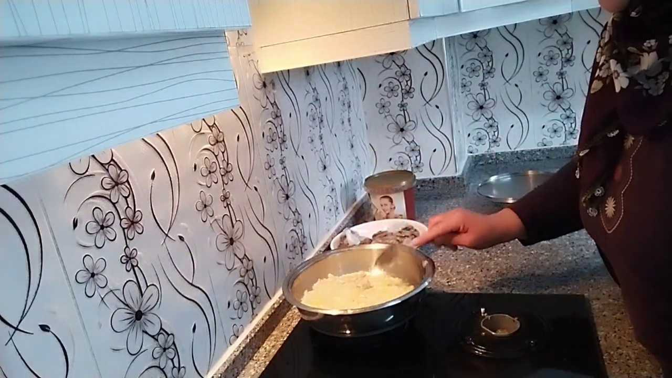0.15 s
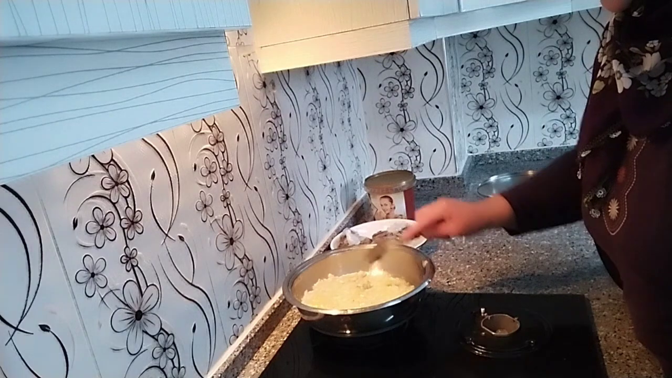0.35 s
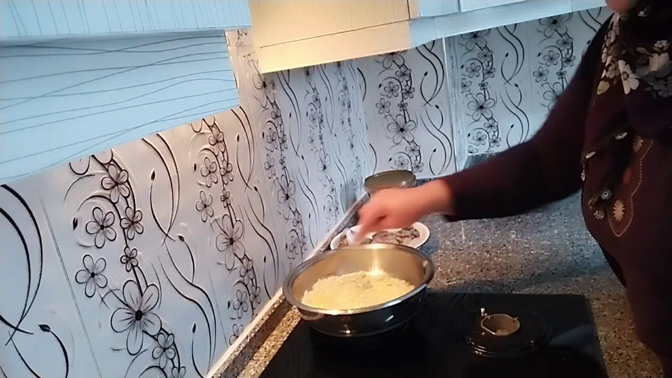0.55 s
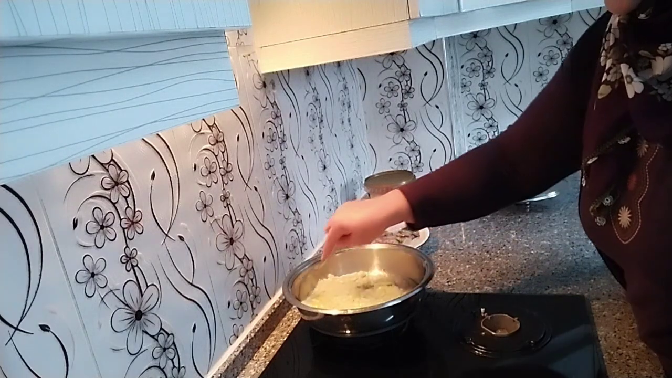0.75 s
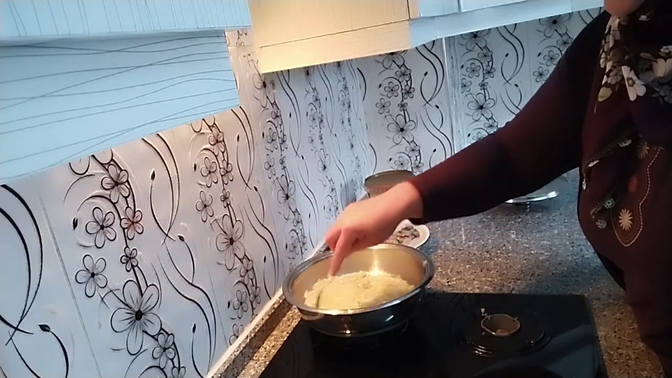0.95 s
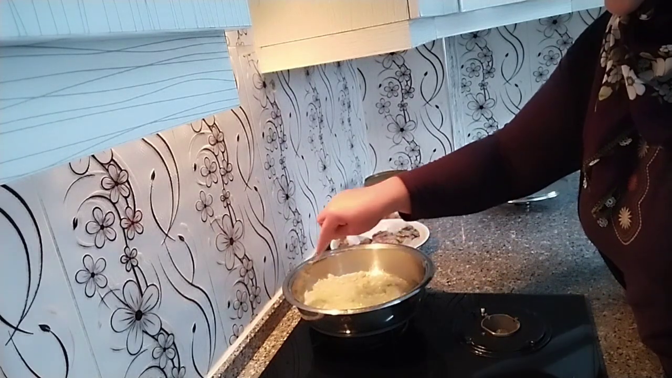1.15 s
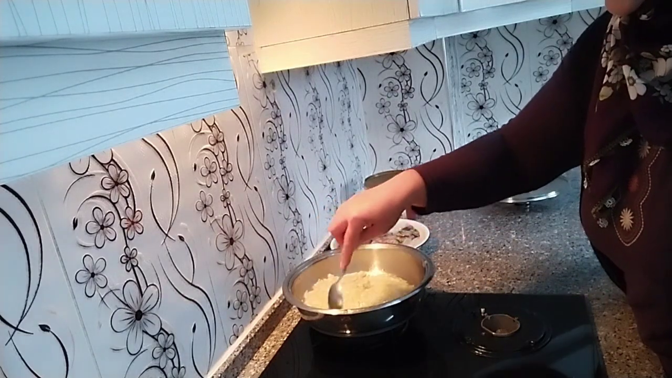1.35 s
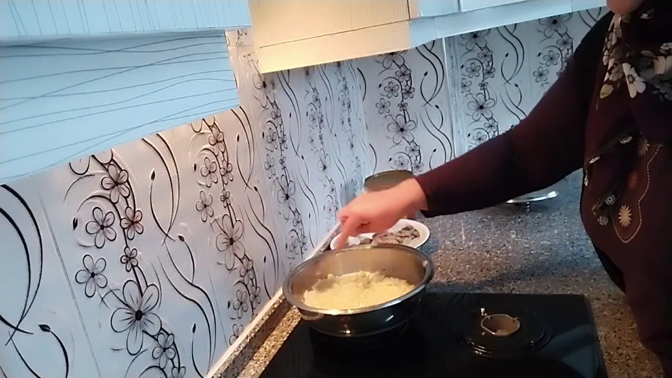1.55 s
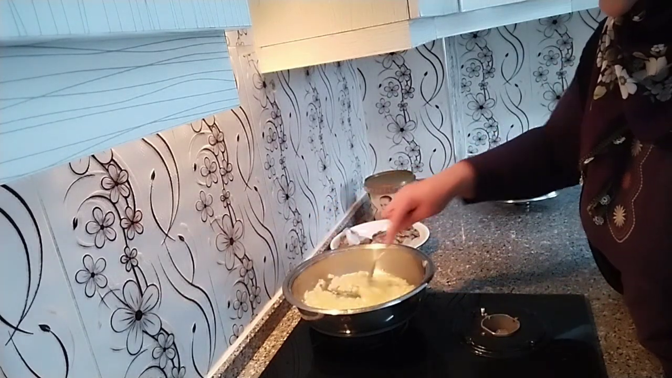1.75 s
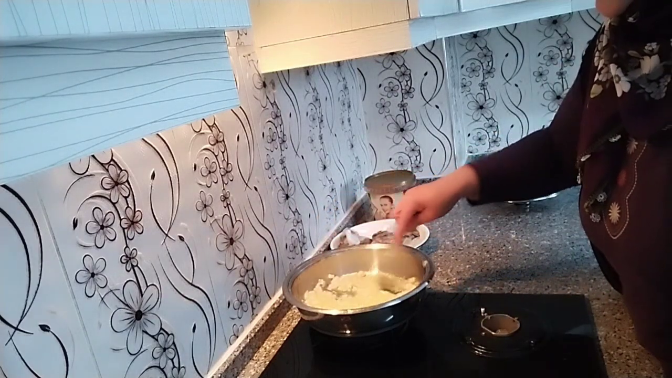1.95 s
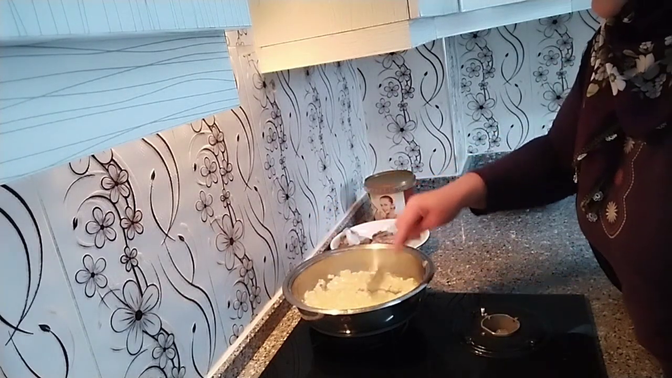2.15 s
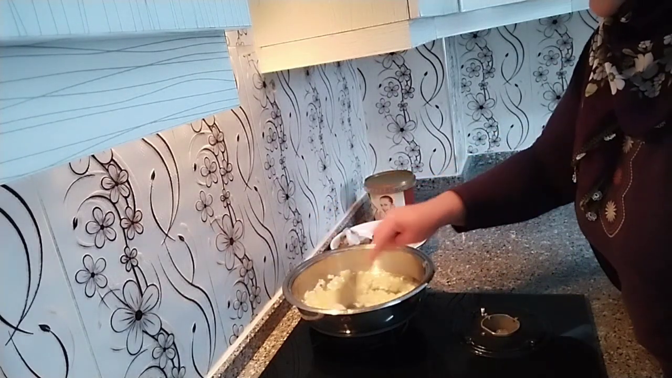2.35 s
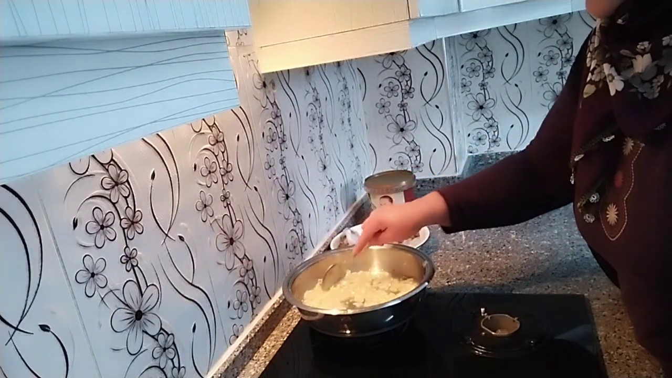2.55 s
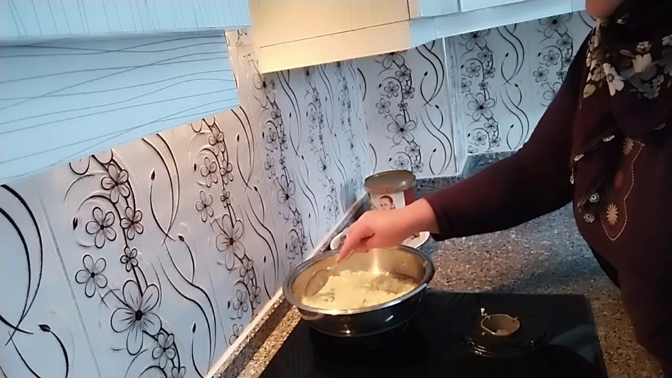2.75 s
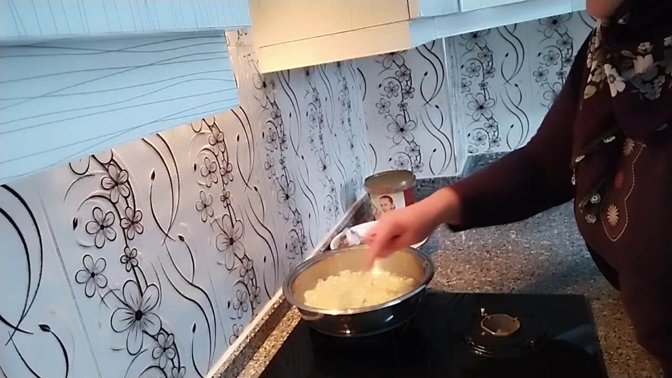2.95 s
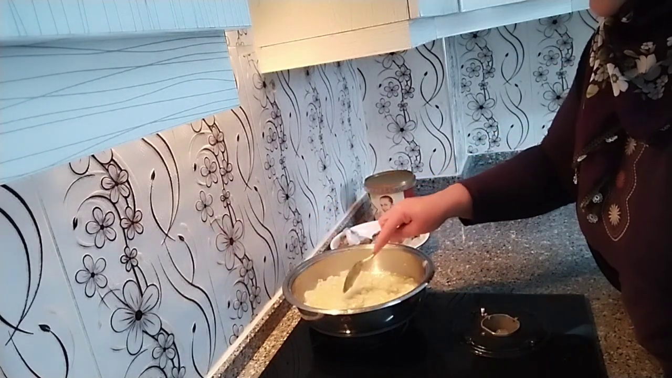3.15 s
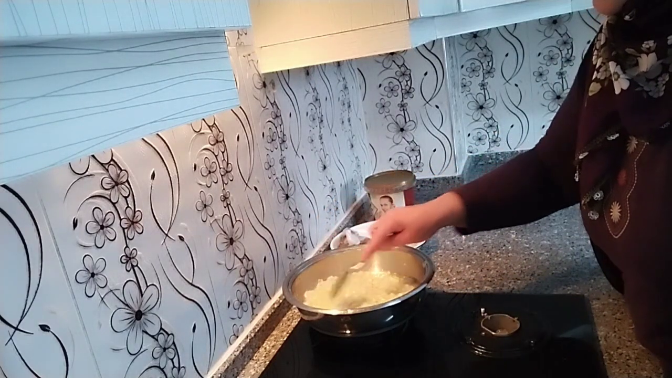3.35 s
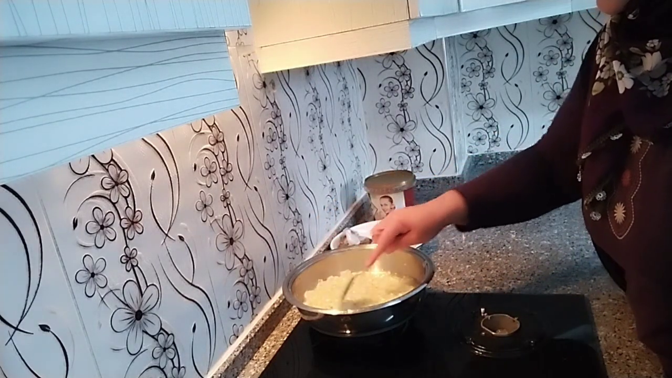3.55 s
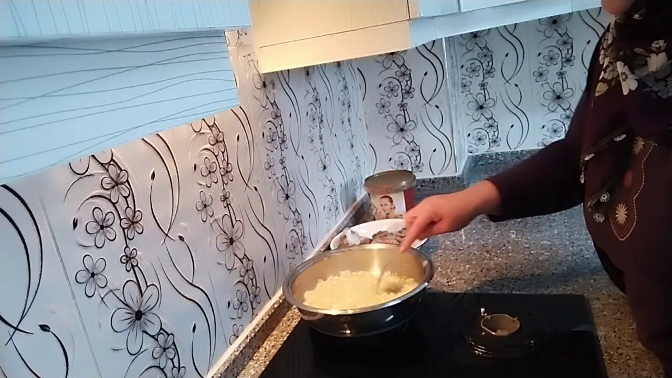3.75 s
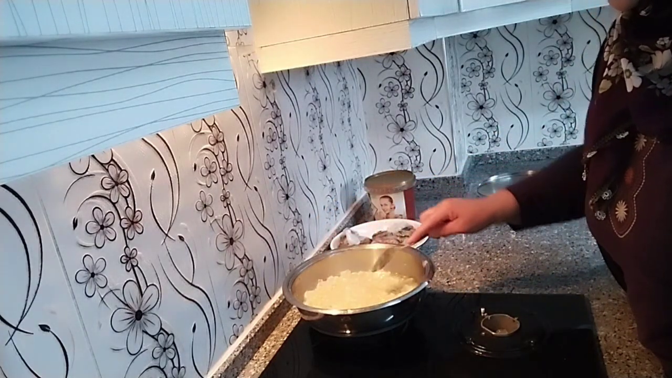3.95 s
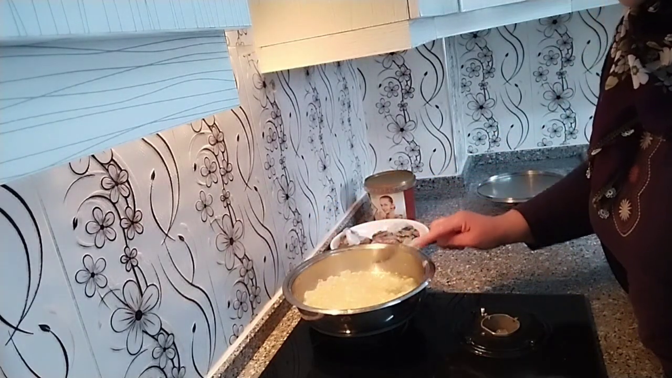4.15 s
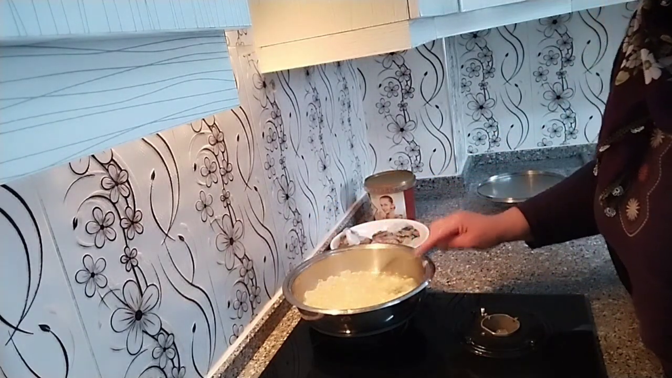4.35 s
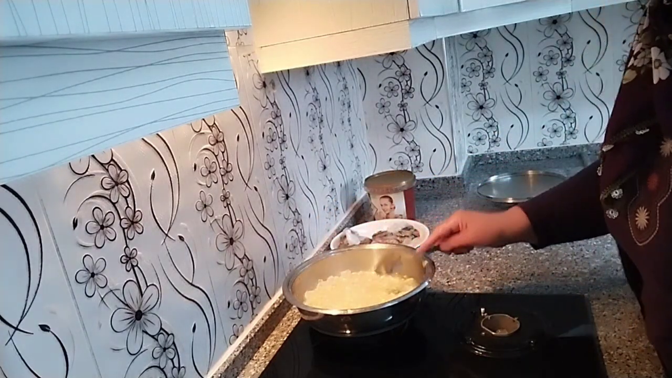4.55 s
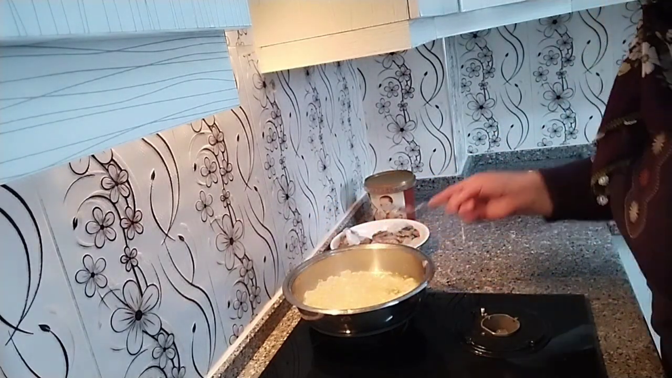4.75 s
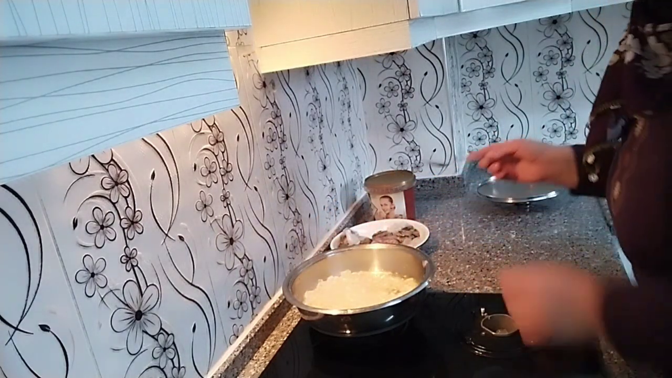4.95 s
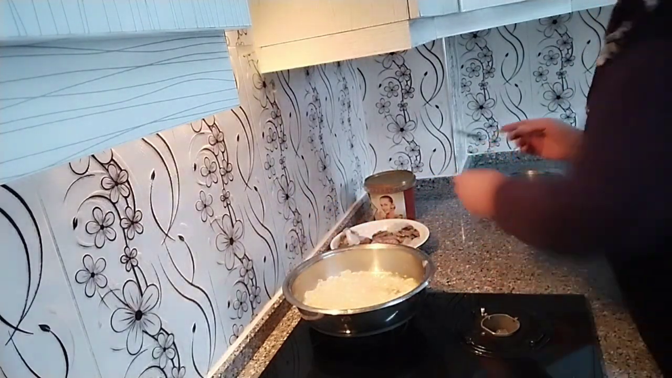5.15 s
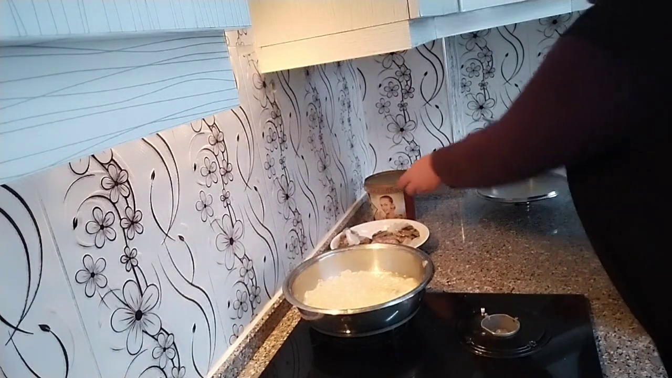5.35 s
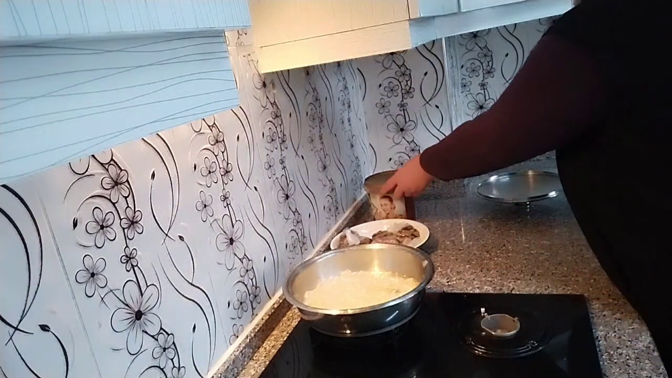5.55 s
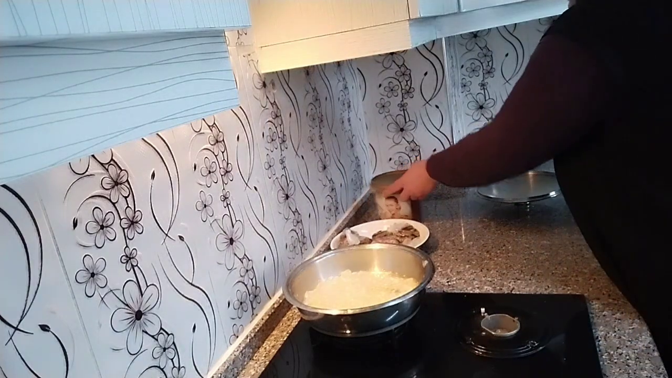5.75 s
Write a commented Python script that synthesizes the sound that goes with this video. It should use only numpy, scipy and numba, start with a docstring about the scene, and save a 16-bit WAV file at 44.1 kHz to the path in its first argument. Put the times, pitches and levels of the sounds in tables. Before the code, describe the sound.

Bright ringing spoon taps on a steel pot, a quieter stretch of stirring over faint sizzle, then three more clanging rim taps in a kitchen.

```python
"""A steel spoon taps the rim of a steel pot three times, stirs frying onions, and taps three times more.
While stirring it knocks and scrapes the wall and knocks the bottom; small pops and ticks are heard too.
Pot and spoon ring as sums of fading sine waves, and each blow adds a crack and a clatter.
Scrapes, pops and the soft sizzle are shaped noise. A small tiled kitchen answers all but the sizzle.
One microphone hears it, with little deep bass and little treble."""
import sys
import numpy as np
from scipy import signal
from scipy.fft import rfft, irfft
from scipy.io import wavfile
from scipy.ndimage import uniform_filter1d
from numba import njit

SR = 44100
rng = np.random.default_rng(int(sys.argv[2]) if len(sys.argv) > 2 else 0)


def log_audio(samples):
    """Write samples as a 16-bit WAV file to the path given in sys.argv[1]."""
    # one column per channel
    frames = np.atleast_2d(samples).T
    # limit to full scale, then quantise
    limited = np.clip(frames, -1, 1)
    pcm = np.round(limited * 32767).astype(np.int16)
    wavfile.write(sys.argv[1], SR, pcm)


N = 260190  # length of the scene in samples

# Sizzle and kitchen hush, only the shape counts. Each row: frequency in Hz, level in dB per Hz.
SIZZLE_COLOUR = [(40, -11.5), (110, -2.5), (200, -8.5), (400, -3.5), (800, -3), (1200, -2.5), (1900, -11),
                 (2600, -4), (4000, -7.5), (6000, -8.5), (8000, -12), (10000, -10), (13000, -17.5),
                 (16000, -10)]
# The sizzle grows while the onions are turned. Each row: time in seconds, level in dB.
SIZZLE_LEVEL = [(0, -54), (1.602, -56), (2.4, -51.5), (3.2, -53.5), (4.2, -54.5), (5.9, -55)]
# Faint narrow resonances in the hush, probably the pot sounding with the sizzle.
# Each row: frequency in Hz, width in Hz, level in dB against the sizzle.
HUSH_RESONANCES = [(592, 20, 5), (754, 24, 7), (830, 20, 5), (890, 12, 8), (1025, 24, 5), (1222, 20, 3)]
# Pitches at which the pot wall can ring, in Hz.
WALL_HZ = [129, 393, 834, 1093, 1114, 1669, 1815, 2273, 2670, 3029, 3071, 3291, 3765, 3800, 3860, 4298,
           4382, 4624, 4829, 5088, 5270, 5313, 5529, 5805, 6138, 6350, 6575, 6670, 7031, 7084, 2972, 3162,
           3316, 3892, 5880]
# How the wall rings at each of those pitches. Each row: level in dB, time to fade by 60 dB in seconds
# before extra losses, then the change in dB per unit of depth below the rim, of place around the rim,
# and of spoon angle.
WALL_MODES = [(-30, 0.61, -11, 5.5, 8), (-31.5, 1, -0.5, 6, -0.85), (-20, 0.56, 4, -11.5, -5.6),
              (-26, 1, -3, 5.5, -5), (-24, 0.49, 0, 1.5, 1.3), (-21.5, 0.41, -2.8, 1, 0.5),
              (-32, 0.99, -6.5, 2.5, -19), (-5.5, 0.5, -1.5, -6, -1), (-13.5, 0.86, -2.5, -9, -7.5),
              (-2, 0.42, -2.1, -3, -2.2), (-9.5, 0.17, -5, -11, 6), (-17.5, 0.36, -10.5, 6, -1.5),
              (-22, 0.17, -4, -9, 18), (-13.5, 0.35, 6.5, 0.5, 0.5), (-6, 0.42, -0.5, 6.5, -6),
              (-23, 0.53, 5.5, 9, -10), (-21.5, 0.29, -11, 3.5, 3.5), (-13.5, 0.14, -3.5, -6, 6.5),
              (-14.5, 0.33, 5, 9.5, 2.5), (-7, 0.54, 1, -7.5, -9), (-22.5, 0.37, 10, 1, -9),
              (-15.5, 0.96, 5.5, 7.5, -0.5), (-28.5, 0.71, 15, 4, -7), (-34.5, 0.18, 12.5, 10, -3.5),
              (-18.5, 0.81, 3, 10, 4), (-25.5, 0.14, 13.5, 1, -6), (-21.5, 0.21, 1, 3.5, -4.5),
              (-18.5, 0.49, -6.5, 4.5, -5.5), (-20, 0.87, -8.5, 4.5, 5.5), (-24, 0.31, -12, -1.5, 2),
              (-21, 0.55, 0, 1, 2), (-19, .4, 1, 5.5, 3), (-18.5, .4, 0, 10, 4), (-8, 0.27, 9, 4.5, -0.5),
              (-21.5, 0.44, 5.5, 7, -1.5)]
# Spoon left free to ring after a blow.
# Each row: frequency in Hz, level in dB, time to fade by 60 dB in seconds.
SPOON_MODES = [(1222, -26, 1.8), (1545, -29, 1.2), (3266, -24, .65), (2015, -38, .9)]
# Short clang of the spoon's bowl.
# Each row: frequency in Hz, level in dB, time to fade by 60 dB in seconds.
BOWL_MODES = [(4382, 1, .18), (4300, -9, .2), (4520, -9, .12), (3880, -8, .2)]
# Blows on rim and wall. Each row: time in seconds, level in dB, depth below the rim, place around the rim,
# spoon angle, clatter in dB, spoon ring in dB, bowl clang in dB, treble of the clatter in dB.
WALL_BLOWS = [(0.091, -10.5, -0.48, 1.38, 0.12, -20.5, -20.5, -42, -1),
              (0.241, -10, 0.046, 0.36, 1.69, -19.5, -17.5, -39.5, -12.5),
              (0.365, -9, -0.15, 0.13, 1.48, -16.5, -28.5, -49, -4),
              (0.847, -33, 0.89, -1.36, 1.14, -39.5, -30.5, -79, 9),
              (1.299, -21.5, 1.23, -0.28, 0.38, -36, -38, -28, 4.5),
              (1.74, -34.5, 1.48, -1.1, 0.52, -25.5, -33.5, -62.5, -15),
              (4.315, -9.5, -1.07, 0.15, -0.12, -16, -11.5, -17, 1),
              (4.493, -17, -1.97, -0.96, -0.44, -18, -22, -32.5, 2.5),
              (4.66, -13, -1.37, -0.62, 0.36, -20, -4.5, -32, 1)]
# Clatter of a blow. Each row: frequency in Hz, level in dB per Hz, time to fade by 60 dB in seconds
# before each part's own shortening and extra losses.
CLATTER_COLOUR = [(104, -11, 0.29), (330, -9.5, 0.62), (574.4, -18, 0.65), (1343, -9, 0.88),
                  (1900, -14.5, 0.81), (3080, -2.5, 0.29), (5240, -6, 0.5), (8400, -3.5, 0.31),
                  (9950, -5.5, 0.36), (13200, -13, 0.25), (16000, -8, .2)]
# Small pops and ticks. Each row: time in seconds, starting level in dB, centre in Hz, width in Hz.
POP_EVENTS = [(0.726, -54.5, 904, 888), (1.242, -52.5, 1472, 2620), (1.457, -36.5, 4020, 4800),
              (1.943, -51, 2720, 3000), (2.745, -47, 3400, 1800), (2.857, -43, 5200, 1795),
              (2.94, -51.5, 1520, 2480), (3.077, -48, 5970, 4000), (3.744, -52, 4075, 503),
              (4.165, -53.5, 864, 800), (5.173, -45, 1640, 1498), (5.258, -51.5, 885, 892),
              (5.35, -53, 810, 707), (5.779, -52, 3940, 234.5), (5.826, -44, 6000, 2170)]
# Spoon edge scraping the wall. Each row: start in seconds, length in seconds, level in dB.
SCRAPE_EVENTS = [(0.99, 0.088, -55), (1.348, 0.11, -41.5)]
# Bottom of the pot, damped by onions. Each row: frequency in Hz, level in dB, time to fade by 60 dB in
# seconds before extra losses, change in dB per unit of distance from the middle.
BOTTOM_MODES = [(133, -14, 0.75, 1), (281.7, -7, 0.19, 9), (750, -13, 0.3, 10), (1039, -27.5, 0.51, 14.5),
                (1518, -14.5, 0.44, 3), (1660, -7.5, 0.15, 2.5), (2415, -7.5, 0.22, 0),
                (2570, -1.5, 0.36, -21), (2770, -4.5, 0.19, -8), (2916, -14.5, 0.28, 2),
                (4140, -8, 0.39, -21), (4010, -7.5, 0.28, -1), (5000, -31.5, 0.082, -20),
                (5060, -24, 0.2, 24.5), (5580, 0, 0.15, -2.5), (5990, 0.5, 0.027, 17), (6520, -13, 0.24, 9),
                (6620, -9, 0.32, -15), (7620, -10.5, 0.27, 6), (7950, 2, 0.11, -7)]
# Knocks on the bottom. Each row: time in seconds, level in dB, distance from the middle from 0 to 1.
BOTTOM_KNOCKS = [(2.013, -23, 0.38), (2.372, -35.5, 0.84), (3.158, -28, 0.22)]
# Microphone colour. Each row: frequency in Hz, level in dB.
MIC_COLOUR = [(30, -20.5), (60, -19.5), (95, -6), (7400, -3), (8400, -12), (9300, -30), (10500, -22),
              (12000, -16.5), (15500, -16), (16200, -33.5)]

SPOON_HELD_S = 5.2  # the other hand closes on the spoon
ONION_DEPTH = 0.43  # below this depth the wall is covered by onions
RIM_LOSS_PER_S, ONION_LOSS_PER_S = 0.56, 1.1  # extra loss at the rim; added per unit of depth into the onions
FREE_LOSS_PER_S = 0.18  # less loss per unit of height on the rim, where the spoon springs off
TILT_DB_PER_DEPTH = 0.46  # per octave: deeper blows have a brighter clatter
# In the clatter: a blow on the rim drives the pot into the stove, one into the onions hardly.
RIM_THUD_DB, THUD_DB_PER_DEPTH = 6.5, -16
RIM_CRACK, ONION_CRACK = 2.2, 1  # crack against clatter at the rim; added per unit of depth into the onions
BEAT_DB, BEAT_DB_PER_DEPTH = -9, 5  # neighbours against each wall mode: high on the rim the ring is purest
KNOCK_CLATTER_DB, KNOCK_TREBLE_DB = -0.5, -8.5  # clatter is against the level of the knock
# Each pair: value in the middle, change out to the wall. Extra loss in 1/s, tilt in dB per octave, thud in dB.
KNOCK_LOSS_PER_S, KNOCK_TILT_DB, KNOCK_THUD_DB = (0.57, 0.19), (1.1, -3), (-12, -3.5)
SCRAPE_RISE_DB_S, SCRAPE_FALL_DB_S = 325, 605  # dB per second
STOP_DB_S = 250  # a scrape ends with the spoon pressed to the wall, which stops the ring
POP_T60_S = 0.14  # for a width of 1 kHz; narrower pops ring longer
ROOM_T60_S, ROOM_DB = .28, -11
TOP_HZ = 16700  # nothing much is heard above this
RING = int(1.3 * SR)  # longest ring, in samples


def undb(db):
    """Turn decibels into a plain factor."""
    return 10 ** (np.asarray(db) / 20)


def add(out, s, x):
    """Mix x into out from time s in seconds."""
    i = int(s * SR)
    out[i:i + len(x)] += x[:N - i]


def colour(x, points):
    """Filter by (Hz, dB) points without sounding early: minimum phase, from the cepstrum."""
    f, db = np.transpose(points)[:2]
    grid = np.linspace(1, SR / 2, 2049)
    log_gain = np.interp(np.log(grid), np.log(f), db) * np.log(10) / 20
    cepstrum = irfft(log_gain)
    # fold the second half onto the first
    cepstrum[1:2048] *= 2
    cepstrum[2049:] = 0
    response = irfft(np.exp(rfft(cepstrum)))
    return signal.fftconvolve(x, response)[:len(x)]


def band(x, hz, width_hz):
    """Keep only a band of frequencies around hz."""
    low = np.sqrt(hz ** 2 + width_hz ** 2 / 4) - width_hz / 2
    high = min(low + width_hz, .49 * SR)
    return signal.sosfilt(signal.butter(2, [low, high], "band", fs=SR, output="sos"), x)


def walk(rate):
    """Wander smoothly between random levels, about rate of them per second, with a spread of 1."""
    hold = int(SR / rate)
    steps = np.repeat(rng.standard_normal(N // hold + 1), hold)
    smooth = uniform_filter1d(uniform_filter1d(steps, hold), hold)[:N]
    return smooth / smooth.std()


def sizzle():
    """Countless tiny bubbles: grainy noise with some larger grains, flickering a little in octave bands."""
    grain_size = np.minimum(rng.exponential(size=N // 64 + 1), 6)
    grains = rng.standard_normal(N) * undb(1.6 * grain_size.repeat(64)[:N])
    hiss = colour(grains, SIZZLE_COLOUR)
    out = hiss.copy()
    for hz in 60 * 2. ** np.arange(0, 9):
        flicker = undb(.7 * walk(20)) - 1
        out += band(hiss, hz, hz * .7) * flicker
    for hz, width_hz, db in HUSH_RESONANCES:
        out += undb(db) * band(hiss, hz, width_hz)
    level_db = np.interp(np.arange(N) / SR, *np.transpose(SIZZLE_LEVEL))
    return out / out.std() * undb(level_db)


@njit
def sines(hz, gain, t60, phase, size):
    """Add up fading sine waves; each t60 is the time in seconds to fade by 60 dB."""
    out = np.zeros(size)
    for k in range(len(hz)):
        # each sample turns z a little and shrinks it a little
        pole = np.exp(2j * np.pi * hz[k] / SR - np.log(1000) / (t60[k] * SR))
        z = gain[k] * np.exp(2j * np.pi * phase[k])
        for i in range(min(size, int(1.2 * t60[k] * SR))):
            out[i] += z.imag
            z *= pole
    return out


def damped(t60, loss):
    """Shorten rings by a loss in 1/s from onions or a lingering spoon; long rings lose most."""
    return 1 / (1 / t60 + max(loss, 0))


def swell(rise_s):
    """Let the start of a ring build up smoothly instead of clicking on."""
    return 1 - np.exp(-np.arange(RING) / SR / rise_s)


def slant(hz, tilt, thud_db, treble_db):
    """Colour one blow in dB: tilt brightens, the thud into the stove adds bass, the spoon edge treble."""
    tilt_db = tilt * np.log2(np.clip(hz, 500, 8000) / 3000)
    bass_db = thud_db / (1 + (hz / 500) ** 4)
    edge_db = treble_db / (1 + (9000 / hz) ** 8)
    return tilt_db + bass_db + edge_db


def ring(hz, db, t60, rise_s=0.0042, twin_db=-10, split_hz=30, count=2):
    """Modes of a round vessel come with close neighbours, mostly weaker, that make them beat."""
    chance = rng.random((2, count * len(hz)))
    t60 = np.maximum(t60, .01)
    centre_hz = np.tile(hz, count)
    # split_hz holds at 3 kHz and grows with pitch
    twin_hz = centre_hz + split_hz * np.sqrt(centre_hz / 3000) * (2 * chance[0] - 1)
    twin_gain = np.tile(undb(db + twin_db), count)
    twins = sines(twin_hz, twin_gain, np.tile(t60, count), chance[1], RING)
    main = sines(hz, undb(db), t60, 0 * hz, RING)
    return (main + twins) * swell(rise_s)


def clatter(db, contact, loss, crack, count=500):
    """A sharp crack, and hundreds of lesser modes of pot and grate, different for every blow."""
    f, spec_db, t60 = np.transpose(CLATTER_COLOUR)
    chance = rng.random((4, count))
    hz = 80 + 16000 * chance[0] ** 1.6
    at = np.log(hz), np.log(f)
    # the modes crowd at the bottom of the range, so each one there is weaker
    crowding_db = 3.75 * np.log10(hz / 3000) - 6
    mode_db = np.interp(*at, spec_db) + slant(hz, *contact) + crowding_db
    gain = undb(db + mode_db - 15.5 * chance[1])
    life = damped(np.interp(*at, t60) * (0.34 + .5 * chance[2]), loss)
    lesser_modes = sines(hz, gain, life, chance[3], RING)
    # the crack fades in 18 ms and is stronger above 9 kHz
    crack_gain = gain * (1 + 0.46 * (hz > 9000))
    sharp_crack = sines(hz, crack_gain, 0.018 + 0 * hz, chance[2], RING)
    return (lesser_modes + crack * sharp_crack) * swell(0.0019)


def stopped(x, s):
    """Fade a ring begun at s when a scrape that soon follows it comes to rest."""
    for start, length, _ in SCRAPE_EVENTS:
        if 0 < start - s < .2:
            since_rest_s = np.arange(len(x)) / SR + s - start - length
            return x * undb(-STOP_DB_S * np.maximum(since_rest_s, 0))
    return x


def taps():
    """Where and how the spoon lands decides how strongly each mode of the wall moves."""
    pot, spoon = np.zeros(N), np.zeros(N)
    hz = np.array(WALL_HZ, float)
    db, t60, *shape_db = np.transpose(WALL_MODES)
    t60 = np.minimum(t60, 1700 / hz)  # high modes radiate their energy sooner
    for s, blow_db, depth, place, angle, clatter_db, spoon_db, bowl_db, treble_db in WALL_BLOWS:
        sunk = np.clip(depth - ONION_DEPTH, 0, 1)
        loss = RIM_LOSS_PER_S + ONION_LOSS_PER_S * sunk + FREE_LOSS_PER_S * min(depth, 0)
        contact = TILT_DB_PER_DEPTH * depth, RIM_THUD_DB + THUD_DB_PER_DEPTH * sunk, treble_db
        mode_db = blow_db + db + np.dot([depth, place, angle], shape_db)
        twin_db = BEAT_DB + BEAT_DB_PER_DEPTH * depth
        wall = ring(hz, mode_db, damped(t60, loss), twin_db=twin_db, split_hz=45, count=4)
        add(pot, s, stopped(wall, s))
        add(pot, s, clatter(clatter_db, contact, loss, RIM_CRACK + ONION_CRACK * sunk))
        spoon_modes = np.transpose(SPOON_MODES) + [[0], [spoon_db], [0]]
        add(spoon, s, ring(*spoon_modes, rise_s=0.017, twin_db=-19.0))
        bowl_modes = np.transpose(BOWL_MODES) + [[0], [bowl_db], [0]]
        add(spoon, s, ring(*bowl_modes))
    held_s = np.maximum(np.arange(N) / SR - SPOON_HELD_S, 0)
    return pot + spoon * undb(-150 * held_s)  # the held spoon fades by 150 dB per second


def pops():
    """Short fading bursts of noise from bursting juice and light touches of the spoon."""
    out, t = np.zeros(N), np.arange(RING // 4) / SR
    for s, db, hz, width_hz in POP_EVENTS:
        burst = band(rng.standard_normal(len(t)), hz, width_hz)
        fade_db = -60 * t * np.sqrt(width_hz / 1000) / POP_T60_S
        add(out, s, burst / burst.std() * undb(db + fade_db))
    return out


def scrapes():
    """Dense uneven slips of the spoon hiss and keep the wall modes sounding."""
    t = np.arange(N) / SR
    push = np.zeros(N)
    for s, length, db in SCRAPE_EVENTS:
        rise_db = SCRAPE_RISE_DB_S * np.maximum(s - t, 0)
        fall_db = SCRAPE_FALL_DB_S * np.maximum(t - s - length, 0)
        push += undb(db - rise_db - fall_db)
    slips = push * rng.standard_normal(N) * undb(4 * walk(400))
    db, t60, deep_db = np.transpose(WALL_MODES)[:3]
    # the wall is rubbed at a depth of 0.85
    wall = sines(np.array(WALL_HZ, float), undb(db + 0.85 * deep_db - 28.5), 0.31 * t60, 0 * db, RING)
    hiss = undb(5.5) * band(slips, 6600.0, 8400.0)
    return hiss + signal.fftconvolve(slips, wall)[:N]


def knocks():
    """The bottom under the onions rings short and blurred, with a hard crack."""
    out = np.zeros(N)
    hz, db, t60, outward_db = np.transpose(BOTTOM_MODES)
    for s, blow_db, distance in BOTTOM_KNOCKS:
        loss, tilt, thud_db = np.dot([KNOCK_LOSS_PER_S, KNOCK_TILT_DB, KNOCK_THUD_DB], [1, distance])
        contact = tilt, thud_db, KNOCK_TREBLE_DB
        mode_db = blow_db + db + distance * outward_db + slant(hz, *contact)
        # many strong neighbours blur each mode
        bottom = ring(hz, mode_db, damped(t60, loss), rise_s=.0006, twin_db=-1, split_hz=110, count=8)
        add(out, s, bottom)
        add(out, s, clatter(blow_db + KNOCK_CLATTER_DB, contact, loss, 7.3))
    return out


def kitchen(x):
    """Tiled walls return a dense tail of noise that builds up, fades, and roughens every ring."""
    t = np.arange(SR // 2) / SR
    tail = rng.standard_normal(len(t)) * undb(-60 * t / ROOM_T60_S) * (1 - np.exp(-t / 0.032))
    echo = signal.fftconvolve(x, tail / np.linalg.norm(tail))[:N]
    return x + undb(ROOM_DB) * echo


def scene():
    """All sources at the single microphone; the sizzle has no added room tail."""
    struck = taps() + knocks() + scrapes() + pops()
    return (kitchen(struck) + sizzle())[None]


def record(dry):
    """The microphone loses deep bass and much above 8 kHz, rounds the loudest peaks and cuts the top."""
    heard = np.tanh(0.77 * colour(dry[0], MIC_COLOUR)) / 0.72
    top_cut = signal.ellip(10, .2, 80, TOP_HZ, fs=SR, output="sos")
    return signal.sosfilt(top_cut, heard)[None]


dry = scene()
out = record(dry)
log_audio(out)
```